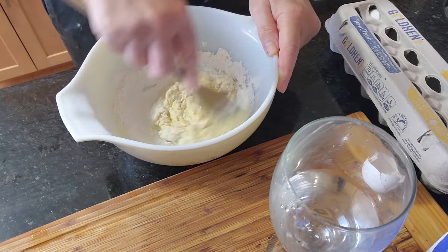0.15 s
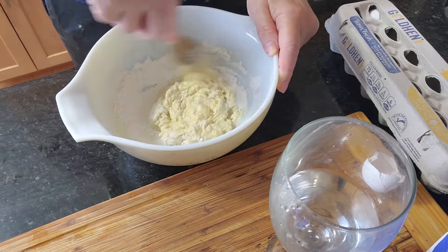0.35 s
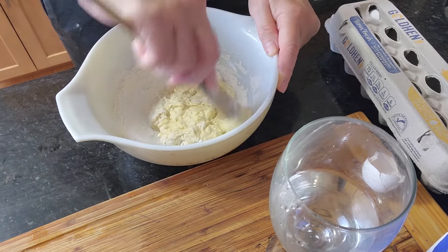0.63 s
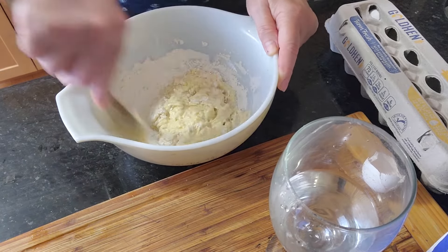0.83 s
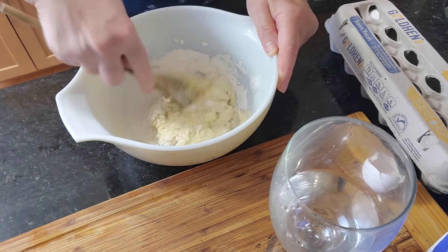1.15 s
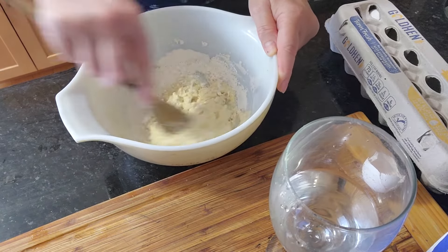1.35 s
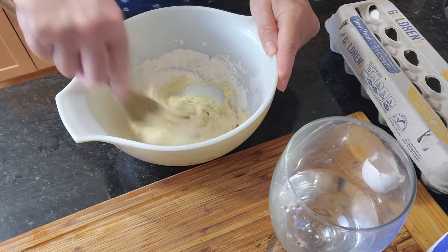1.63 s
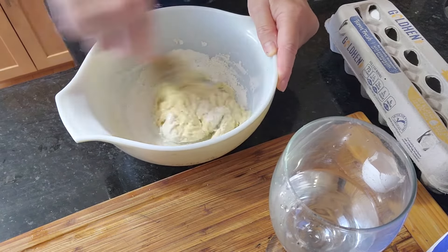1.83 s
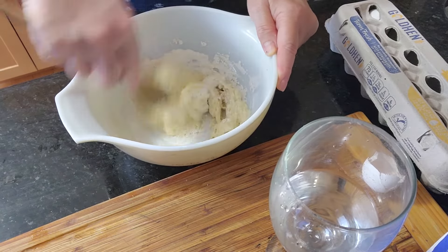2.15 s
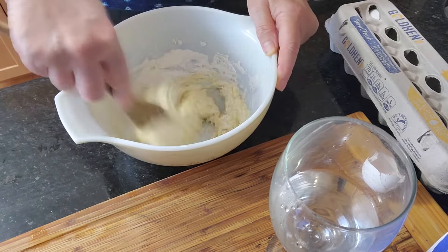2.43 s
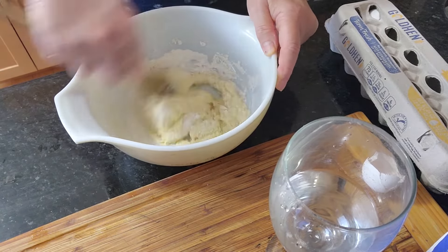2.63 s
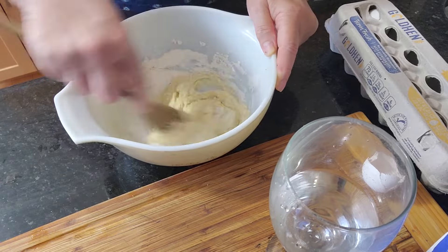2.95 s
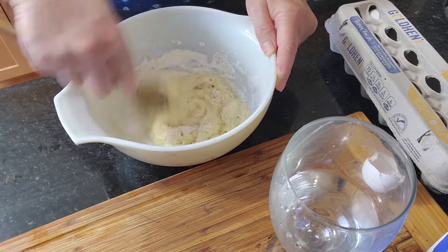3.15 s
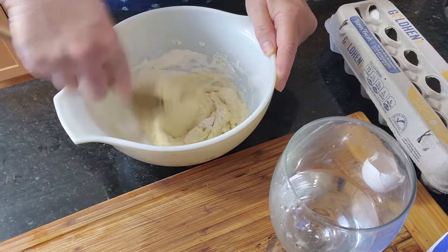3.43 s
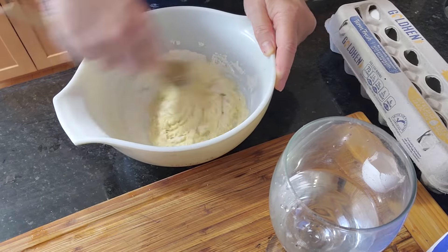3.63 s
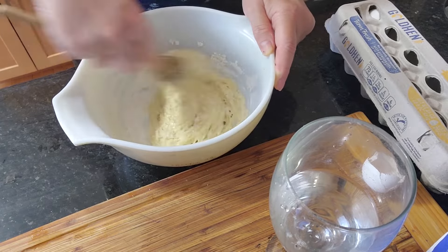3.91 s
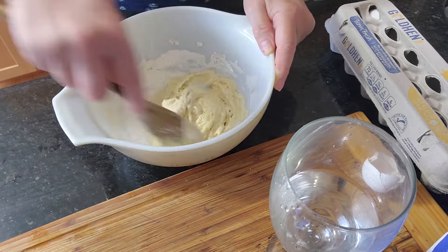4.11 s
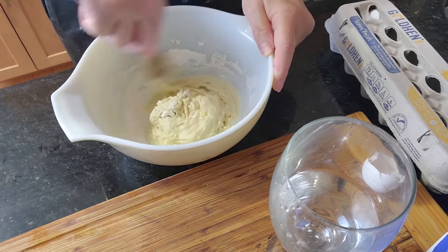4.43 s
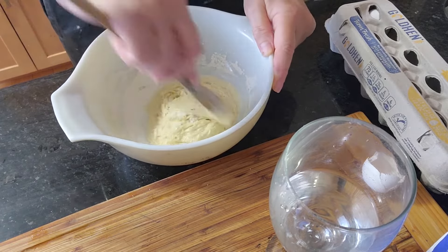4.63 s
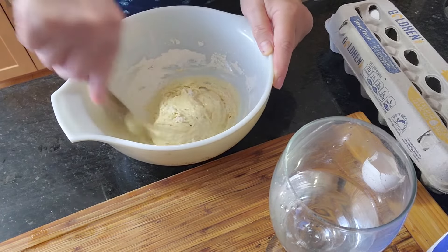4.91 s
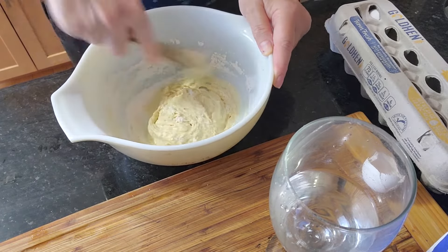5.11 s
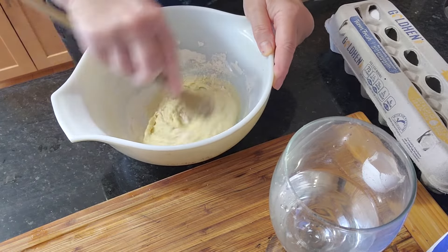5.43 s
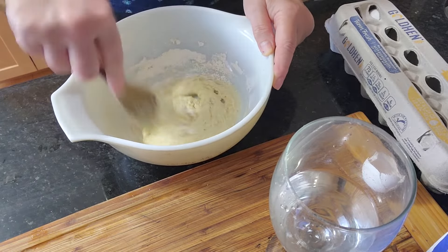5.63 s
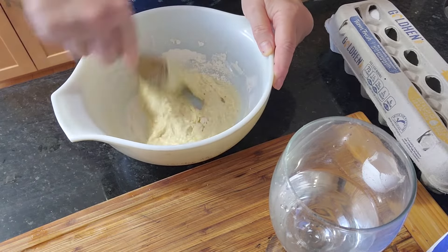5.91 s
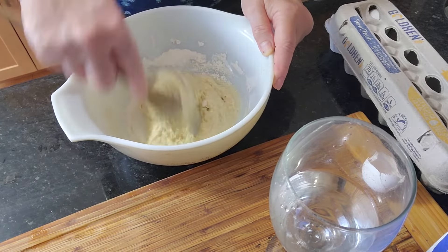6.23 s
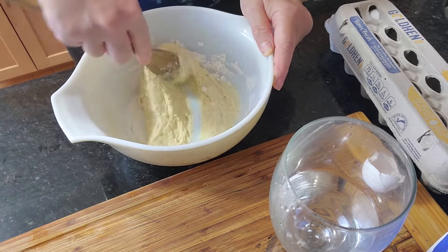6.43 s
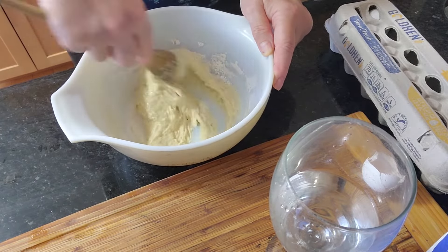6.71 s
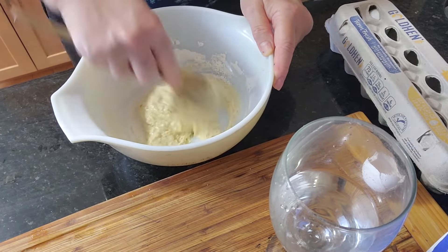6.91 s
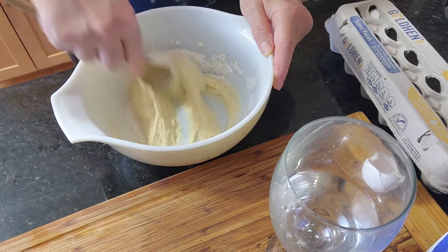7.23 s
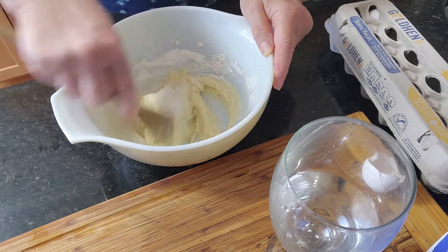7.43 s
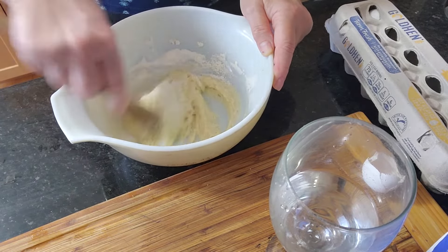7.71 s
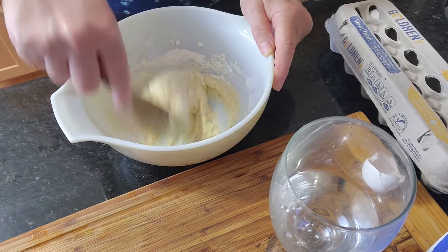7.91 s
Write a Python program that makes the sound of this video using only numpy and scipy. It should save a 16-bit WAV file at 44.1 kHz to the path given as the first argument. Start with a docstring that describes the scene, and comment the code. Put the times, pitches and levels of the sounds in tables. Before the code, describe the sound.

Close to the microphone and a little to the left, a spoon drags through sticky batter and bumps a heavy, damped bowl. Gritty swishes alternate with small wet smacks; rapid blows cluster in the middle, followed by slower strokes and two standout bright knocks. The kitchen adds a short, dry reflection. A low throbbing engine, passing drones and a barely audible whine lie beneath soft room hiss.

```python
"""Batter beaten in a glass bowl

Thick batter is beaten with a wooden spoon in a glass bowl on a kitchen counter. Stick-slip noise and
cushioned blows excite the damped modes of the bowl, and coloured noise bursts are the batter's smacks.
Sparse reflections form the kitchen; slow engine orders, drones and a whine come from outside over a hush."""
import sys
import numpy as np
from scipy import signal
from scipy.fft import rfft, irfft
from scipy.io import wavfile
from scipy.ndimage import uniform_filter1d

SR = 44100
rng = np.random.default_rng(int(sys.argv[2]) if len(sys.argv) > 2 else 0)


def file_out(sig):
    """Save sig as 16-bit WAV at sys.argv[1]."""
    # one column per channel
    cols = np.atleast_2d(sig).T
    # limit, then scale
    lim = np.clip(cols, -1, 1)
    pcm = np.round(lim * 32767).astype(np.int16)
    wavfile.write(sys.argv[1], SR, pcm)


N = 355649  # samples


def amp(db):
    """Level to amplitude: 20 dB is a factor of ten."""
    return 10 ** (np.asarray(db) / 20)


def evened(x):
    """Normalization to unit root mean square."""
    return x / np.sqrt(np.mean(x ** 2) + 1e-20)


def read(points, hz):
    """Interpolation of a spectrum on a logarithmic frequency axis."""
    f, value = np.transpose(points)
    return np.interp(np.log(hz + 1), np.log(f + 1), value)


def add(mix, s, sound):
    """Superposition: a sound joins the mix at s seconds."""
    part = mix[..., round(s * SR):][..., :sound.shape[-1]]
    part += sound[..., :part.shape[-1]]


def shape(x, gain):
    """Linear filtering: the spectrum is multiplied by gain(hz)."""
    hz = np.fft.rfftfreq(x.shape[-1], 1 / SR)
    return irfft(rfft(x) * gain(hz), x.shape[-1])


# Strokes of the spoon through batter along the glass, and hiss sprayed by the hardest blows (4.43, 6.655 s):
# start_s, hold_s, hiss_db, rub_db (bowl, relative to hiss), rasp_db (lower part of the noise, relative to hiss)
STROKES = [(.17, 0.094, -59, 1, 2.5), (.325, 0.01, -47.5, -2, 1), (.50, 0.35, -73, -20, -4.5),
           (.69, 0.029, -57.5, -5, -1.5), (.83, 0.28, -62, -1.5, 4.5), (1.16, 0.23, -71.5, -3, 0.5),
           (1.45, 0.3, -62.5, -4, -2.5), (1.70, 0.25, -59.5, -6, -2.5), (2.04, 0.23, -60.5, -2, -1),
           (2.32, 0.041, -55.5, -1.5, -.6), (2.43, 0.32, -59.5, -3.5, -2.7), (2.86, 0.023, -57, 2, -10),
           (2.96, 0.03, -57, -0.5, -8), (3.10, 0.042, -57.5, -2.5, -6), (3.22, 0.018, -55, 1.5, -9),
           (3.35, 0.16, -59.5, 1.7, -11), (3.60, 0.17, -61, 3, -8), (3.89, 0.067, -58.5, 7.5, -3.5),
           (4.33, .07, -58.5, 1.5, 3.5), (4.43, 0.0064, -48, 5, 2.5), (4.84, 0.3, -60, -2, 0.3),
           (5.448, .015, -67, -12, 2), (5.51, 0.077, -60.5, -5, -5), (5.83, 0.032, -56, -5, -2),
           (6.09, 0.076, -60, -7.5, -3), (6.32, .015, -69.5, 0, 3.5), (6.37, 0.062, -58, -5.5, -2),
           (6.655, 0.036, -55, 7, 2.5), (6.915, 0.1, -60.5, -2, -.6), (7.18, 0.099, -59.5, -12, -2.5),
           (7.48, 0.042, -56, -3.5, -3.5), (7.72, 0.063, -60, -2, -1), (8.04, .03, -65, -3, 3)]
# Batter moving between strokes: start_s, hiss_db
SWISH = [(0, -74), (1.3, -87.5), (1.5, -67), (3.9, -67.5), (4.05, -78.5), (8.06, -77)]
SWISH_RUB_DB = -12  # relative to the swish
RISE_S, FALL_S, BEND = 0.03, 0.031, 0.97  # times of the last 10 dB of gain or loss; exponent of the slope


def pressure():
    """Masking by maximum: strokes swell, hold and die, and the loudest sets hiss, rub and rasp in dB."""
    start, hold, hiss_db, rub_db, rasp_db = np.transpose(STROKES)[:, :, None]
    t = np.arange(0, N / SR + .002, .002)
    away = np.maximum(start - t, 0) / RISE_S + np.maximum(t - start - hold, 0) / FALL_S
    arch_db = hiss_db - 10 * away ** BEND
    swish_db = np.interp(t, *np.transpose(SWISH))
    hiss = np.maximum(arch_db.max(0), swish_db)
    rub = np.maximum((arch_db + rub_db).max(0), swish_db + SWISH_RUB_DB)
    rasp = np.maximum((arch_db + rasp_db).max(0), swish_db)
    return t, hiss, rub, rasp


def wet_grains(per_s, spread_db):
    """Damped bubble resonance: tiny pockets of air pop in the batter, each a few cycles long."""
    size = amp(spread_db * np.minimum(rng.exponential(1, N), 5)) * (rng.random(N) < per_s / SR)
    pitches_hz, t = np.geomspace(1800., 9000., num=24), np.arange(300) / SR
    kind, out = rng.integers(0, len(pitches_hz), N), np.zeros(N)
    for k, hz in enumerate(pitches_hz):
        cycles = hz * t
        pop = cycles * np.exp(-cycles / 4.0) * np.sin(2 * np.pi * cycles)
        out += signal.oaconvolve(size * (kind == k), pop)[:N]
    return evened(out)


# Modes of the bowl, held and damped by batter: pitch_hz, level_db, t60_s (before scaling by length)
BOWL = [(171, 0.5, 0.17), (212.8, 3.5, 0.074), (241.6, -24.5, 0.045), (340.6, 1.5, 0.0945),
        (397.6, -2, 0.18), (437.5, 3, 0.083), (459, -7.5, 0.062), (541.4, 1, 0.1), (630.3, -3.5, 0.049),
        (715.4, -1, 0.09), (785, 2.5, 0.025), (914, -4, 0.017), (1031, -5, 0.021), (1070.4, 2, 0.046),
        (1205, 3, 0.045), (1285, 4, 0.072), (1379.6, 3.5, 0.018), (1475, -3.5, 0.15), (1519, -1, 0.077),
        (1734, -22, 0.15), (2003, -16.5, 0.16), (2036, -12, .13), (2320, -16, .07), (3736, -33, .05)]


def ring(weights_db, phases, length, contact=0.0095):
    """Modal synthesis: the place struck weights the decaying modes, and batter makes them swell in softly."""
    hz, db, t60 = np.transpose(BOWL)[:, :, None]
    t = np.arange(SR // 8) / SR
    weight_hz = (250, 345, 520, 696, 950, 1400, 1900)
    weights_db = np.insert(weights_db, 1, weights_db[1])  # 345 and 520 Hz share one weight
    db = db + read(list(zip(weight_hz, weights_db)), hz)
    swell = np.sin(np.pi / 2 * np.minimum(t / contact, 1)) ** 2  # contact in s
    decay = amp(db - 60 * np.maximum(t - contact, 0) / (t60 * length))
    modes = decay * np.sin(2 * np.pi * (hz * t + phases[:, None]))  # phases in turns
    return swell * modes.sum(0)


# Colour of the stroke noise, also used by the smacks: pitch_hz, level_db (per Hz, relative)
HISS = [(710, -42.5), (1200, -23.5), (1380, -7), (1680, -14.5), (2000, -7), (2300, -5), (3910, -7.5),
        (5070, -1.5), (5970, -7.5), (7490, -4.5), (9010, -14), (15000, -13.5), (16000, -31.5)]
RASP_HZ = 4000  # the rasp lies below this


def strokes():
    """Stick-slip friction: patchy noise with wet grains, whose drag also rubs the bowl's modes."""
    s, hiss_db, rub_db, rasp_db = pressure()
    t = np.arange(N) / SR
    flicker = amp(2.5 * evened(uniform_filter1d(rng.standard_normal(N), size=400)))
    drag = flicker * rng.standard_normal((2, N))
    drag[1] = .5 * drag[0] + 0.98 * drag[1]  # the two ports hear the wide hiss only partly alike
    z = signal.stft(drag, nperseg=1024, noverlap=768)[2]
    # narrow bands stand out for a few hundredths of a second as the spoon edge changes its angle
    patches = uniform_filter1d(rng.standard_normal(z.shape[1:]), size=3, axis=0)
    patches = evened(uniform_filter1d(patches, size=10, axis=1))
    patchy = signal.istft(z * amp(3.8 * patches), nperseg=1024, noverlap=768)[1][:, :N]
    noise = evened(patchy) + .3 * wet_grains(per_s=700, spread_db=3.5)
    noise = evened(shape(noise, lambda hz: amp(read(HISS, hz))))
    rasp = shape(noise, lambda hz: 1 / (1 + (hz / RASP_HZ) ** 12))
    fine = noise - rasp
    hiss = rasp * amp(np.interp(t, s, rasp_db)) + fine * amp(np.interp(t, s, hiss_db))
    bowl = ring((-8.0, -3.0, -5.0, -6.5, -19.5, -3.0), rng.random(len(BOWL)), length=0.46)
    rub = evened(signal.oaconvolve(drag[0], bowl)[:N])
    return hiss + rub * amp(np.interp(t, s, rub_db))


# Spoon knocks, often a soft touch and then the blow: start_s, level_db, thump_db (counter, relative),
# brightness_db_per_octave (of the place struck), lean_db (towards the 1 kHz ring, shared by LEAN)
KNOCKS = [(.182, -38, -21, -6.5, 1.5), (.225, -57.5, -26, 16, -15), (0.323, -35.5, -39, 2.5, -4),
          (0.888, -51, -24, -5, -8), (1.773, -44.5, -3.5, 7.5, 7), (1.814, -26, -20, 4, -1),
          (1.826, -26, -22.5, 3, 1.5), (2.107, -35.5, -15, 2, 0), (2.257, -49.5, -6, -5.5, -7),
          (2.359, -34.5, -14.5, -6, 4), (2.375, -33.5, -18, -3.5, -2), (2.478, -49, -15.5, -1, 9),
          (2.612, -43, -11.5, -3.5, -9), (2.627, -33, -15, 4, 5), (2.639, -34, -32.5, -4, -1),
          (2.728, -44, -9, 3, 0), (2.867, -38, -18, -1.5, 0), (2.88, -27.5, -27.5, 4, -2),
          (2.966, -44.5, -26, -2, 16), (3.056, -38.5, -8.5, -1.5, 7), (3.12, -42, -21, -1, -1),
          (3.133, -30, -20.5, 2.5, 0), (3.143, -33.5, -25, -5.5, 0), (3.359, -42.5, -9, 1, 13),
          (3.382, -33, -24.5, 1, -1), (3.393, -26, -33.5, 4, 0), (3.55, -45, -13.5, -2, 6.5),
          (3.592, -47.5, -4.5, -3.5, 5), (3.656, -26, -19, 1.5, 2.5), (3.662, -17.5, -26, 10, 4),
          (3.674, -28, -22.5, 1.5, 1), (3.858, -40, -6, 0, 2.5), (3.916, -24, -23, 7.5, -1.5),
          (4.216, -56.5, -13.5, -17.5, -4.5), (4.309, -46, -3, -3.5, 1), (4.33, -43.5, -3.5, 2.5, 3),
          (4.425, -8.5, -30.5, 7, 7.5), (4.806, -51, -7.5, -9, 4), (5.036, -52, -4.5, 7, -13.5),
          (5.089, -43.5, -7.5, -3, -2.5), (5.489, -51, -13, -10, 10), (5.781, -52, 4.5, -27.5, 8),
          (6.321, -51, 8, -8, 2), (6.604, -45, -13, -11, 11), (6.654, -14.5, -25, 8, 7),
          (6.877, -43, -19.5, -11, 11), (6.953, -34, -32, 4, -1), (6.964, -48.5, -16, 4.5, 16),
          (7.156, -43, -9, 2, -5.5), (7.205, -43.5, -15, -11, 8), (7.43, -37.5, -14, 1, 3.5),
          (7.657, -43.5, -21, -14.5, 0), (7.717, -41, -18, -6, 6), (7.995, -45.5, -12, -14.5, 4)]
# How an average blow drives the four rings: pitch_hz, level_db
BLOW = [(430, -15), (700, -15), (1040, -16), (1400, -22)]
# Share of lean_db taken by each of the four rings: factor
LEAN = (-.5, .3, 1, -1)
PIVOT_HZ = 700  # brightness tilts the spectrum about this pitch
RING_LENGTH, SHORTER_PER_DB = 0.91, 0.0162  # t60 factor of a -26 dB blow; its loss per dB for softer ones


def knocks():
    """Impact excitation: cushioned blows ring the bowl; the spoon chatters a little while on the glass."""
    out, (hz, blow_db) = np.zeros(N), np.transpose(BLOW)
    chance = rng.random((len(KNOCKS), len(BOWL) + SR // 8))
    for (s, db, thump_db, bright, lean_db), draw in zip(KNOCKS, chance):
        phases, chatter = np.split(draw, [len(BOWL)])
        chatter = amp(3.07 * evened(uniform_filter1d(chatter - .5, size=150)))
        rings_db = blow_db + bright * np.log2(hz / PIVOT_HZ) + lean_db * np.array(LEAN)
        clack_db = rings_db[-1] + .35 * (db + 12.0)  # harder blows reach the higher modes
        length = max(RING_LENGTH + SHORTER_PER_DB * (db + 26), .2)
        blow = ring([thump_db, *rings_db, clack_db], phases, length)
        add(out, s - .004, amp(db) * chatter * blow)
    return out


# Batter smacks and dry cracks of wood on glass: start_s, level_db (before rise and decay), colour_hz, t60_s
SMACKS = [(0.1411, -53, 2360, 0.062), (0.2184, -45.5, 3160, 0.16), (0.3269, -37, 5840, 0.019),
          (0.6853, -27, 4100, 0.024), (0.817, -54, 4380, 0.067), (1.083, -40, 3100, 0.018),
          (1.4807, -50, 5600, 0.027), (1.5207, -43, 7400, 0.022), (1.577, -46.5, 5940, 0.045),
          (2.037, -48, 2400, 0.048), (2.141, -43, 4970, 0.026), (2.1937, -46.5, 5020, 0.034),
          (2.3452, -43, 4550, 0.028), (2.6895, -32.5, 5460, 0.0091), (2.7275, -34, 2530, 0.028),
          (3.059, -44.5, 3320, 0.025), (3.2244, -23.5, 7770, 0.01), (3.645, -49, 5500, 0.072),
          (3.6624, -37, 5000, 0.045), (4.255, -36.5, 7560, 0.018), (4.4257, -22, 7930, 0.033),
          (5.2063, -54, 3250, 0.045), (5.5233, -58.5, 5540, 0.039), (5.8821, -43, 5440, 0.038),
          (6.107, -38.5, 5370, 0.016), (6.375, -42.5, 4560, 0.026), (6.491, -52, 5000, 0.025),
          (6.648, -31, 9260, 0.025), (6.6553, -31.5, 7700, 0.042), (6.788, -48, 5090, 0.018),
          (6.9597, -35, 5320, 0.047), (7.168, -47, 5210, 0.042), (7.3014, -38.5, 5500, 0.016),
          (7.43, -39, 4810, 0.016), (7.5086, -41, 7400, 0.045), (7.6575, -54.5, 2400, 0.06),
          (7.7137, -47.5, 2470, 0.085), (7.728, -36, 7340, 0.026)]
SMACK_WIDTH, SMACK_BROAD = .045, .25  # half-width as a fraction of the colour; broad floor, amplitude


def smacks():
    """Filtered noise bursts: broad puffs, coloured by a resonance, partly alike at the two ports."""
    out, t = np.zeros((2, N)), np.arange(3000) / SR
    for (s, db, hz, t60), noise in zip(SMACKS, rng.standard_normal((len(SMACKS), 3, len(t)))):
        def colour(f):
            peak = 1 / (1 + ((f - hz) / (SMACK_WIDTH * hz)) ** 2)
            return amp(read(HISS, f)) * (SMACK_BROAD + peak)

        puff = evened(shape(noise[0] + 0.26 * noise[1:], colour))
        envelope = (1 - np.exp(-t / 0.0024)) * amp(-60 * t / t60)
        add(out, s - .001, amp(db) * puff * envelope)
    return out


# Reverberation of the kitchen: pitch_hz, t60_s
KITCHEN = [(200, 0.78), (700, 0.31), (1500, 0.22), (2500, 0.087), (5000, 0.12), (10000, 0.14)]


def kitchen(x):
    """Reverberation: sparse reflections of random sign, each band dying at its own speed."""
    taps = np.zeros((2, SR // 2))
    at = np.arange(200, SR // 2 - 20, 20) + rng.integers(0, 20, (2, (SR // 2 - 201) // 20))
    np.put_along_axis(taps, at, rng.choice([-1., 1.], at.shape), 1)
    hz, t, z = signal.stft(taps, SR, nperseg=256)
    decay = amp(-60 * t / read(KITCHEN, hz)[:, None])
    tail = signal.istft(z * decay, SR, nperseg=256)[1]
    return signal.fftconvolve(x, tail / np.linalg.norm(tail[0]), axes=1)[:, :N]


# Idling engine: start_s, low_throb_db, upper_throb_db
ENGINE = [(0, -49, -56.5), (.45, -48.5, -54), (1.55, -49.5, -46.5), (2.2, -50.5, -54.5), (2.7, -49, -51.5),
          (3.8, -50, -54), (4.5, -48, -52), (6.0, -54.5, -51.5), (6.599, -48, -53.5), (7.5, -50, -55),
          (8.06, -52, -68)]
# Cycle rate of the engine: start_s, pitch_hz
ENGINE_HZ = [(0, 10.3), (.35, 9.9), (.75, 9.15), (1.4, 9.0), (2.2, 9.15), (3.2, 9.15), (3.9, 9.0),
             (4.5, 9.1), (5.5, 8.95), (6.5, 9.05), (7.25, 9.1), (7.8, 8.4), (8.07, 8.3)]
# Engine orders: multiple (of the cycle rate), throb (0 low, 1 upper)
THROB_ORDERS = ((8, 0), (9, 0), (12, 1), (13, 1))
# Share of each order in its throb: level_db
THROB_DB = (-4, -9.5, -1.5, -7.5)
LOW_ORDER_DB = -63.5  # the third order, steady in level
WAVER_DB, WAVER_S = 2.5, .25  # spread of each order's level; time between its random points


def engine():
    """Harmonic orders: multiples of one slightly uneven cycle rate, the upper four wavering slowly."""
    t, (s, *throbs_db) = np.arange(N) / SR, np.transpose(ENGINE)
    turns = np.cumsum(np.interp(t, *np.transpose(ENGINE_HZ))) / SR
    out = amp(LOW_ORDER_DB) * np.sin(2 * np.pi * 3 * turns)
    for (k, throb), db, draw in zip(THROB_ORDERS, THROB_DB, rng.standard_normal((4, 200))):
        waver_db = WAVER_DB * np.interp(t / WAVER_S, np.arange(200), draw)
        level_db = db + waver_db + np.interp(t, s, throbs_db[throb])
        out = out + amp(level_db) * np.sin(2 * np.pi * (k * turns + rng.random()))
    return np.sqrt(2) * out


def tone(rows):
    """Phase accumulation: a sine follows a table's pitch and level, faded at both ends."""
    s, hz, db = np.transpose(rows)
    t, out = np.arange(s[0], s[-1], 1 / SR), np.zeros(N)
    turns = np.cumsum(np.interp(t, s, hz)) / SR + rng.random()
    fade = signal.windows.tukey(len(t), .04)
    add(out, s[0], np.sqrt(2) * amp(np.interp(t, s, db)) * np.sin(2 * np.pi * turns) * fade)
    return out


# Two passing drones, one table each: start_s, pitch_hz, level_db
DRONES = [
    [(1.6, 55.2, -75), (1.85, 54.34, -54.5), (3.6, 62.9, -52.5)],
    [(5.6, 43.55, -69.5), (6.29, 40.4, -63), (8.06, 37.9, -55.5)],
]
# A faint whine comes and goes: start_s, length_s, top_level_db
WHINE = [(0.954, 0.89, -60.5), (2.101, 1.44, -66), (5.896, 1.1, -64.5), (7.297, 0.72, -66)]
WHINE_HZ, WHINE_ENDS_DB = 277.4, -3.5  # level at the ends is relative to the top


def outside():
    """Transmission: engine, drones and whine come through the walls almost alike at both ports."""
    whine = []
    for s, length, db in WHINE:
        ends_db = db + WHINE_ENDS_DB
        whine.append([(s, WHINE_HZ, ends_db), (s + length / 2, WHINE_HZ, db), (s + length, WHINE_HZ, ends_db)])
    return amp([[.2], [-.2]]) * (engine() + sum(tone(rows) for rows in DRONES + whine))


# Colour of the hush: pitch_hz, level_db (per Hz, relative)
HUSH = [(8.8, -43), (15, -6), (97, 2.5), (130, -4), (174, -11.5), (559, -25), (628, -31.5), (793, -26),
        (1160, -40), (1790, -39), (4980, -58.5), (6110, -57), (7490, -48.5), (9190, -69.5), (16000, -57)]
# Left-right likeness of the hush: pitch_hz, correlation (0 to 1)
SAME = [(60, 0.84), (150, 0.96), (400, 0.76), (1500, .3), (5000, .05)]
HUSH_DB, HUSH_PATCH_DB = -50.5, 2.  # overall level; spread of the patches


def hush():
    """Partly coherent noise: room rumble and microphone hiss as random short-time spectra, mildly patchy."""
    frames, hz = N // 512 + 5, np.fft.rfftfreq(2048, 1 / SR)
    a, b, c, d, patches = rng.standard_normal((5, 1025, frames))
    patches = uniform_filter1d(patches, size=12, axis=0)
    patches = evened(uniform_filter1d(patches, size=8, axis=1))
    same = np.clip(read(SAME, hz), -1, 1)[:, None]
    left = a + 1j * b
    right = same * left + np.sqrt(1 - same ** 2) * (c + 1j * d)
    z = np.array([left, right]) * amp(read(HUSH, hz)[:, None] + HUSH_PATCH_DB * patches)
    return amp(HUSH_DB) * evened(signal.istft(z, nperseg=2048, noverlap=1536)[1][:, :N])


# Level difference of the bowl between the ports: pitch_hz, left_over_right_db
LEFT_DB = [(200, 1), (600, 3.5), (1200, 4.5), (2500, 3), (8000, 3.5), (14000, 3)]
# Phase difference of the bowl between the ports: pitch_hz, left_lead_rad
LEAD = [(200, 0.17), (600, 0.496), (1200, 1.01), (3000, 1.11), (9000, 1.7)]


def scene():
    """Interaural-style cues: the bowl is close and off to one side of the two microphone ports."""
    bowl = strokes() + knocks() + smacks()
    side = np.array([[.5], [-.5]])  # each port takes half of the difference
    ports = shape(bowl, lambda hz: amp(side * read(LEFT_DB, hz)) * np.exp(1j * side * read(LEAD, hz)))
    return ports + amp(-14) * kitchen(bowl) + hush() + outside()


EDGE_HZ = 15850  # upper band limit


def record(dry):
    """Band limitation: a linear-phase low-pass filter."""
    lowpass = signal.firwin(511, EDGE_HZ, window=("kaiser", 9), fs=SR)
    return signal.oaconvolve(dry, lowpass[None], "same")


dry = scene()
out = record(dry)
file_out(out)
```